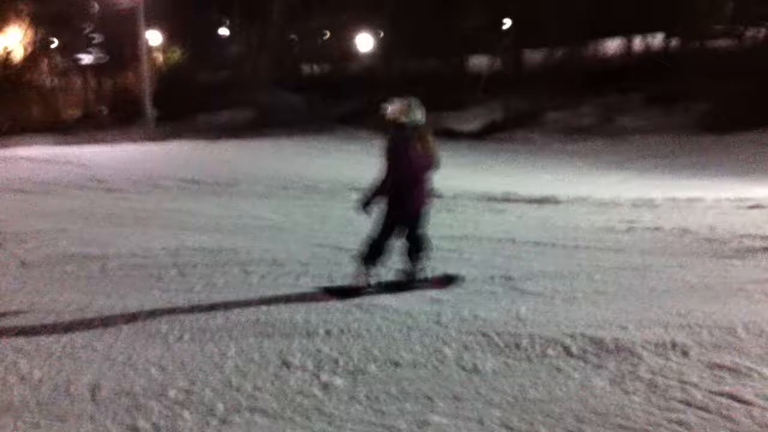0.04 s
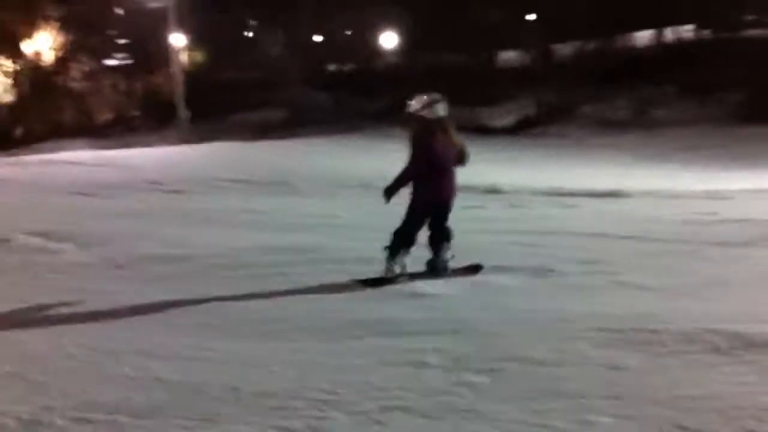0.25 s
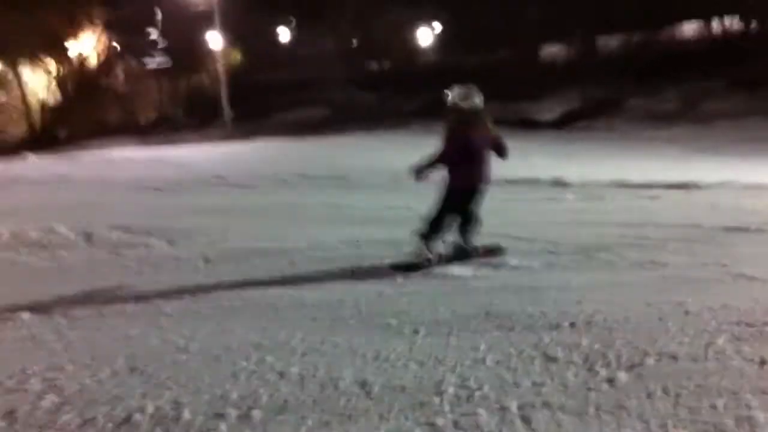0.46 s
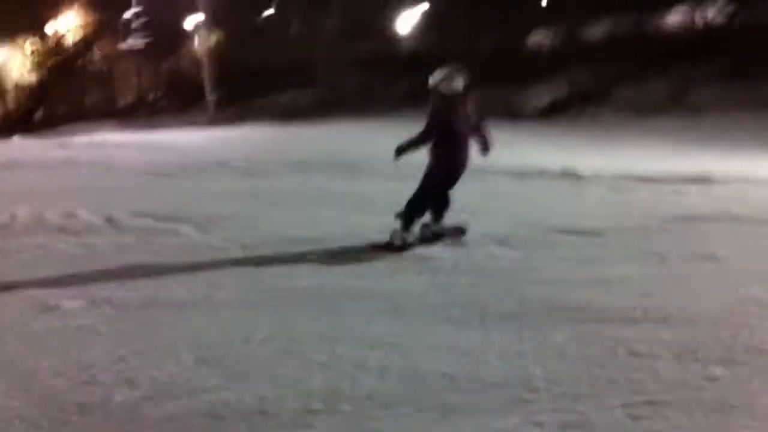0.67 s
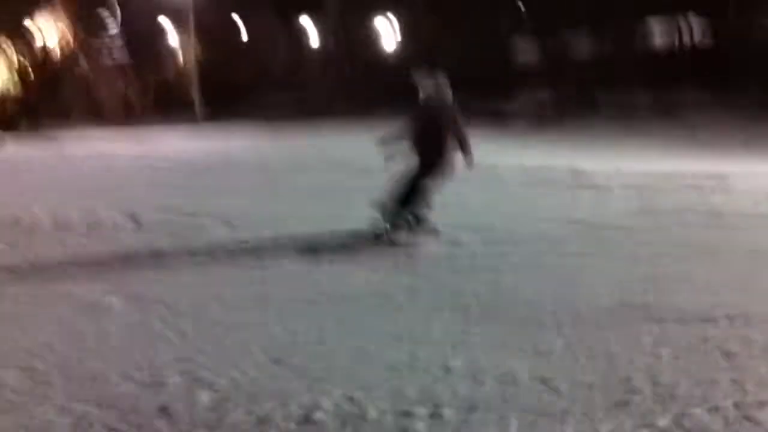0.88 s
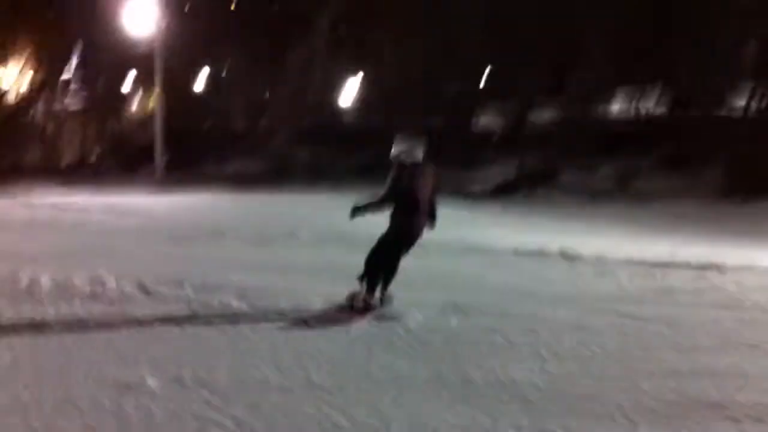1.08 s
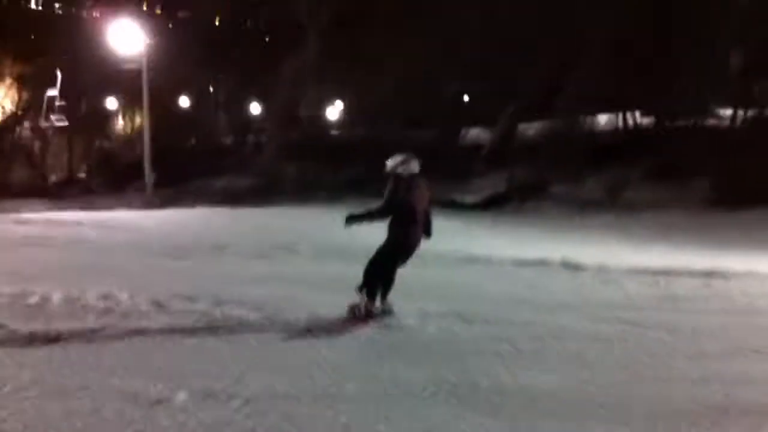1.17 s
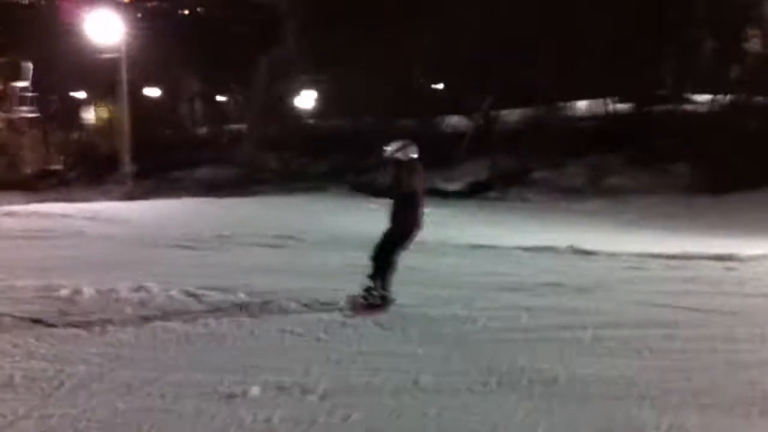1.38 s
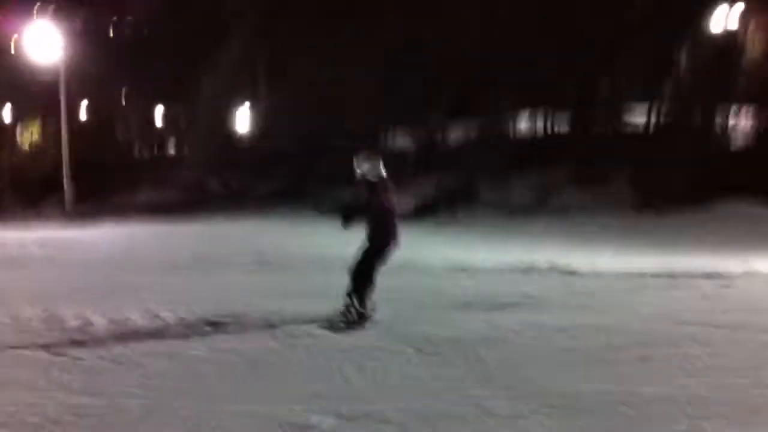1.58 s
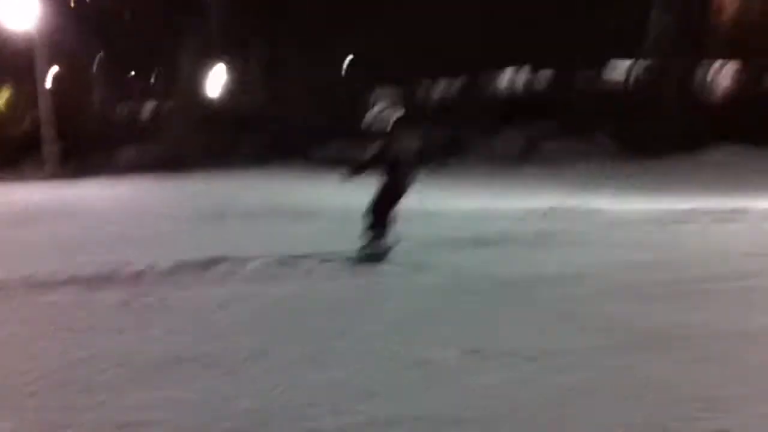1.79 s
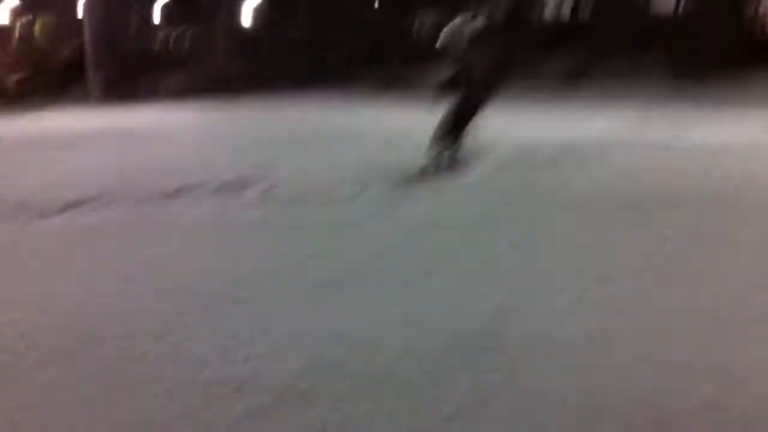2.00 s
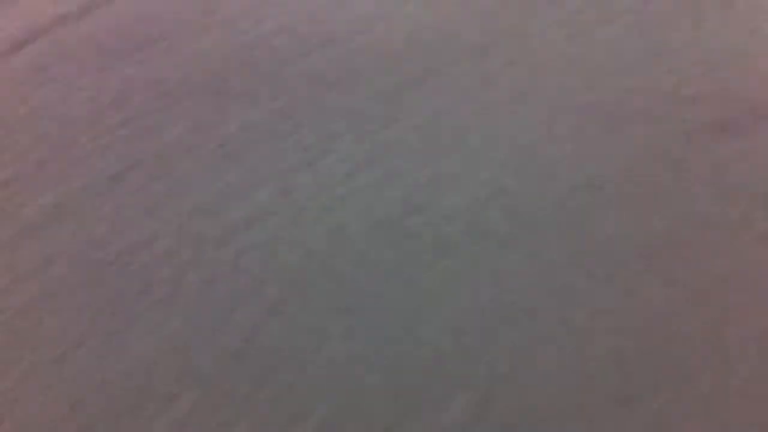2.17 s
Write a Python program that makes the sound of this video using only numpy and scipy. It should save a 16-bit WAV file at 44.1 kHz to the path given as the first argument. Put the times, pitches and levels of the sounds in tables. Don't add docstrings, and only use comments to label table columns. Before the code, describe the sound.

Abruptly starting, uneven snowboard scrape on groomed snow, with hollow board bumps and steady gritty hiss; it thins midway as the edge faintly sings, then grinds harder with fine sizzling spray, close, dry and thin in bass.

```python
import sys
import numpy as np
from scipy import signal
from scipy.fft import rfft, irfft, next_fast_len
from scipy.io import wavfile
from scipy.ndimage import uniform_filter1d, map_coordinates

SR = 44100
rng = np.random.default_rng(int(sys.argv[2]) if len(sys.argv) > 2 else 0)


def decibels_to_gain(level_db):
    exponent = np.asarray(level_db, float) / 20
    return 10 ** exponent


def digitize_waveform(pressure):
    field = np.atleast_2d(pressure).T
    bounded = np.clip(field, -1, 1)
    quanta = np.round(bounded * 32767).astype(np.int16)
    wavfile.write(sys.argv[1], SR, quanta)


N = 98739


def unit(x):
    return x / np.sqrt(np.mean(x ** 2) + 1e-20)


def along(points, hz):
    f, v = np.transpose(points)
    return np.interp(np.log(hz + 1), np.log(f + 1), v)


def curve(rows):
    s, *columns = np.transpose(rows)
    return [np.interp(np.arange(N) / SR, s, column) for column in columns]


def wobble(rate):
    knots = rng.standard_normal(int(N * rate / SR) + 4)
    return map_coordinates(knots, [np.arange(N) * rate / SR])


def filtered(x, response):
    m = next_fast_len(N + SR // 2)
    return irfft(rfft(x, m) * response(np.fft.rfftfreq(m, 1 / SR)), m)[..., :N]


def patchy(x, patchy_db):
    z = signal.stft(x, nperseg=512)[2]
    field = uniform_filter1d(rng.standard_normal(z.shape), size=6, axis=0)
    field = uniform_filter1d(field, size=8, axis=1)
    return signal.istft(z * decibels_to_gain(patchy_db * unit(field)), nperseg=512)[1][:N]


def grains(per_s, spread_db):
    breaks = rng.random(N) < per_s / SR
    size = np.minimum(rng.exponential(size=N), 2)
    sign = np.tanh(rng.standard_normal(N))
    return unit(breaks * decibels_to_gain(spread_db * size) * sign)


def jolts():
    # t/s, level/dB
    pushes = [
        (0.125, -44),
        (0.225, -36),
    ]
    jolt_s, wind_hz, wind_db, gusty_db = 0.0025, 120, -72, 2
    t = np.arange(N) / SR
    wind = unit(filtered(rng.standard_normal(N), lambda f: f / (1 + (f / wind_hz) ** 6)))
    pressure = sum(decibels_to_gain(db) * np.exp(-((t - s) / jolt_s) ** 2) for s, db in pushes)
    return pressure + decibels_to_gain(wind_db + gusty_db * wobble(11.6)) * wind


def spray(uneven_db):
    # t/s, level/dB, finest dust/dB
    thrown = [(0.12, -25.5, -17), (0.49, -27, -17.5), (0.57, -30.5, -19), (0.65, -23, -15),
              (0.71, -32, -18), (0.74, -27.5, -15.5), (0.99, -30.5, -16), (1.09, -28.5, -12),
              (1.24, -31, -14.5), (1.81, -26, -8), (1.91, -28.5, -10), (1.95, -23, -9), (2.0, -22.5, -4.5),
              (2.16, -26, -9), (2.21, -34.5, -1), (2.23, -27.5, -12)]
    # f/Hz, level per Hz/dB
    fizz = [(880, -14), (1500, -5.5), (2140, -2), (2800, -5), (9650, -10), (14500, -13), (16000, -14)]
    crystals_per_s, spread_db, crystal_db = 4000, 4, -9.5
    spray_db, dust_hz, fine_db = 2.5, 11400, 8.5
    impacts = rng.standard_normal(N) + decibels_to_gain(crystal_db) * grains(crystals_per_s, spread_db)
    hiss = unit(filtered(patchy(impacts, patchy_db=1.0), lambda hz: decibels_to_gain(along(fizz, hz))))
    dust = filtered(hiss, lambda f: 1 / (1 + (dust_hz / (f + 1)) ** 8))
    level_db, dust_db = curve(thrown)
    gain = decibels_to_gain(level_db + spray_db + uneven_db + 0.75 * wobble(19.83))
    return gain * (hiss + (decibels_to_gain(dust_db + fine_db) - 1) * dust)


def ring(t, hz, t60_s, rise_s):
    return decibels_to_gain(-60 * t / t60_s) * (1 - np.exp(-t / rise_s)) * np.sin(2 * np.pi * hz * t)


def bumps():
    # t/s, thud level/dB, knock level/dB, knock f/Hz
    ridges = [(0.118, -3.5, -21, 896), (0.186, -8, -11, 940), (0.236, -14, -9.5, 960),
              (0.319, -17, -13, 930), (0.479, -22, -8.5, 1150), (0.61, -25, -17, 840),
              (0.634, -16, -11.5, 826), (0.651, -8.5, -15, 1140), (0.669, -26, -9.5, 1184),
              (0.756, -15, -15, 1037), (0.86, -25, -14.5, 820), (1.059, -13, -14, 840),
              (1.098, -9, -15, 920), (1.153, -6, -18, 1370), (1.417, -20, -19, 1040),
              (1.814, -26, -21, 1280), (1.949, -20, -28, 1260), (1.977, -17, -29, 802),
              (2.039, -9.5, -19, 1290), (2.138, -10, -21, 1210), (2.189, -14, -24, 520),
              (2.222, -14, -41, 500)]
    thud_hz, trim_db, knock_trim_db = 302, -3.5, 2
    out, t = np.zeros(N + SR), np.arange(SR // 8) / SR
    for s, thud_db, knock_db, knock_hz in ridges:
        hz = thud_hz * (1 + 0.03 * rng.standard_normal())
        thud = decibels_to_gain(thud_db + trim_db) * ring(t, hz, t60_s=0.07, rise_s=0.0019)
        knock = decibels_to_gain(knock_db + knock_trim_db) * ring(t, knock_hz, t60_s=0.035, rise_s=0.0012)
        out[round(s * SR):][:len(t)] += thud + knock
    return out[:N]


def edge(uneven_db):
    # t/s, f/Hz, level/dB
    bites = [
        (1.33, 1898, -39),
        (1.405, 2205, -34),
        (1.43, 1050, -35),
        (1.52, 1384, -29),
        (1.6, 2100, -30),
        (1.681, 1099, -39),
        (1.76, 2000, -36),
        (1.805, 2140, -29),
        (1.85, 745, -36),
        (1.901, 695, -48),
    ]
    width_hz, edge_db, fade_s = 370, -1.5, 0.075
    s, hz, db = np.transpose(bites)
    t = np.arange(N) / SR
    a, b = filtered(rng.standard_normal((2, N)), lambda f: 1 / (1 + (2 * f / width_hz) ** 2))
    phase = 2 * np.pi * np.cumsum(np.interp(t, s, hz)) / SR
    song = unit(a * np.cos(phase) + b * np.sin(phase))
    fade = np.clip((t - s[0]) / fade_s + 1, 0, 1)
    return fade * decibels_to_gain(np.interp(t, s, db) + edge_db + uneven_db) * song


def deck(f, modes):
    response = 0
    for k, (centre, width, db) in enumerate(modes):
        damping = 1j * f * width
        response = response + (-1) ** k * decibels_to_gain(db) * damping / (centre * centre - f * f + damping)
    return response


def scrape(uneven_db):
    # t/s, level/dB
    pressing = [(0.125, -15), (0.15, -20), (0.33, -19), (0.37, -22), (0.48, -16.5), (0.57, -29.5),
                (0.61, -17), (0.675, -16), (0.708, -28.5), (0.76, -19), (0.87, -19), (0.98, -33),
                (1.06, -20.5), (1.2, -24), (1.25, -30), (1.34, -31), (1.43, -26.5), (1.75, -30.5),
                (1.8, -26),
        (1.84, -22.5),
        (1.882, -29),
        (1.93, -23),
        (2.02, -20.5),
        (2.192, -22.5),
        (2.208, -36),
        (2.222, -28),
        (2.235, -24.5),
    ]
    # f/Hz, width/Hz, level/dB
    flat_modes = [(283.5, 115, 1.5), (370, 325, -4), (955, 305, -4.5), (1160, 336, -5), (1980, 137, -8.5),
                  (2810, 330, -14.5)]
    # f/Hz, width/Hz, level/dB
    bent_modes = [(285, 100, -3), (382, 157, 0), (984, 200, -5), (1305, 250, -3.5), (2000, 290, -8.5),
                  (2900, 330, -14)]
    # f/Hz, level per Hz/dB
    between = [(82, -26), (140, 0), (289, -6), (624, -10), (938, -5), (1630, -16.5), (6000, -29.5),
               (7800, -74), (13200, -120)]
    crusts_per_s, spread_db, between_db, scrape_db = 2500, 3, -1, 1
    turn_s, turn_takes_s = 1.37, 0.31
    crusts = patchy(grains(crusts_per_s, spread_db), patchy_db=3)
    flat = unit(filtered(crusts, lambda f: deck(f, flat_modes)))
    bent = unit(filtered(crusts, lambda f: deck(f, bent_modes)))
    turn = np.clip((np.arange(N) / SR - turn_s) / turn_takes_s + 0.5, 0, 1)
    envelope = between + [(9000, -60)]
    wide = unit(filtered(rng.standard_normal(N), lambda hz: decibels_to_gain(along(envelope, hz))))
    load_db, = curve(pressing)
    board = unit((1 - turn) * flat + turn * bent + decibels_to_gain(between_db) * wide)
    return decibels_to_gain(load_db + scrape_db + uneven_db) * board


def scene():
    chatter_db, tremble_db, shared = -0.01, 1.5, 0.43
    uneven_db = chatter_db * wobble(13.23) + tremble_db * wobble(60)
    return (spray(shared * uneven_db) + bumps() + edge(uneven_db) + scrape(uneven_db))[None]


def thinned(x):
    # f/Hz, level/dB
    mute_db = [(9000, -90), (11500, -73), (16000, -68)]
    hz, _, z = signal.stft(x, SR, nperseg=2048)
    strength = uniform_filter1d(np.abs(z), size=4, axis=1)
    treble = hz > mute_db[0][0]
    threshold = decibels_to_gain(along(mute_db, hz)) * treble
    return signal.istft(z * (strength > threshold[:, None]), SR, nperseg=2048)[1][..., :N]


def bass_cut(f):
    cut_hz, leak_db = 174, -18.5
    s = 1j * f
    return s ** 3 / (s ** 3 + 2 * s ** 2 * cut_hz + 2 * s * cut_hz ** 2 + cut_hz ** 3) + decibels_to_gain(leak_db)


def top_cut(x):
    return signal.sosfilt(signal.butter(12, 16510, fs=SR, output="sos"), x)


def record(dry):
    top, knee, top_hz = 0.55, 3, 15780
    start_s, rise_s = 0.1198, 0.0012
    x = filtered(dry, bass_cut)
    x = x / (1 + np.abs(x / top) ** knee) ** (1 / knee)
    x = filtered(thinned(x), lambda f: bass_cut(f) * (f < top_hz)) + jolts()
    start = np.clip((np.arange(N) / SR - start_s) / rise_s, 0, 1)
    return top_cut(x * start)


dry = scene()
out = record(dry)
digitize_waveform(out)
```